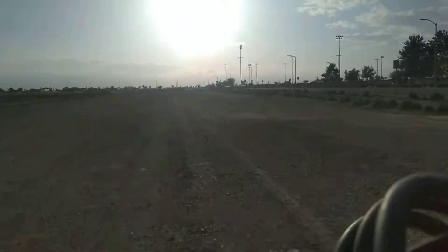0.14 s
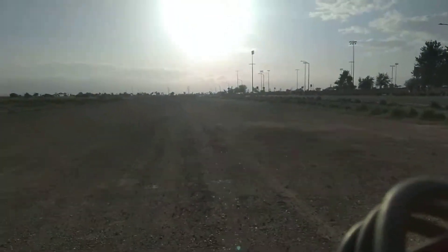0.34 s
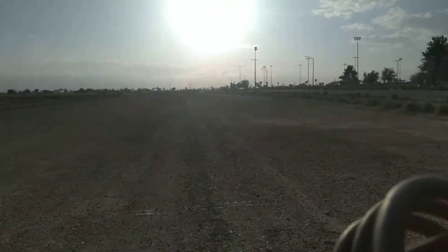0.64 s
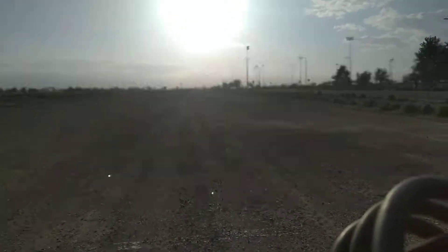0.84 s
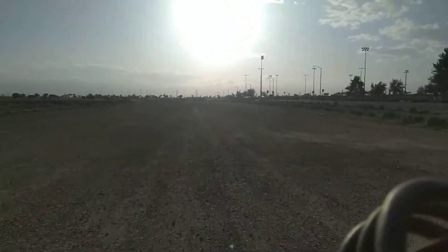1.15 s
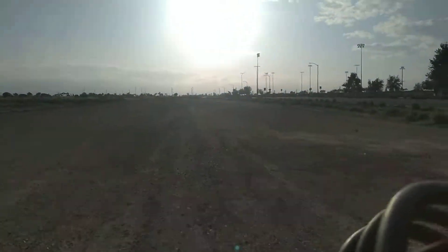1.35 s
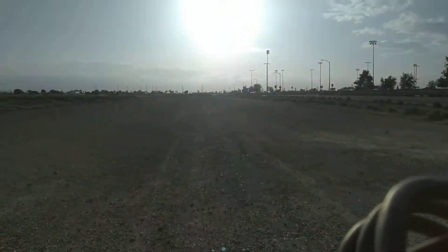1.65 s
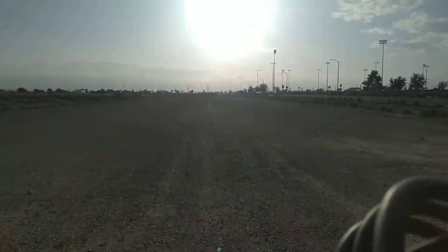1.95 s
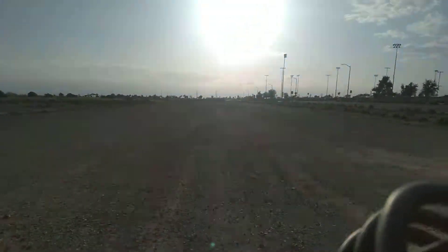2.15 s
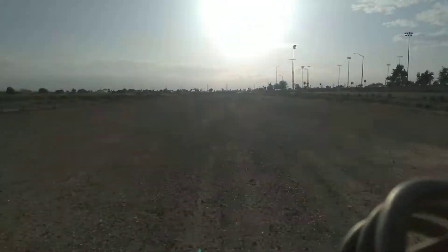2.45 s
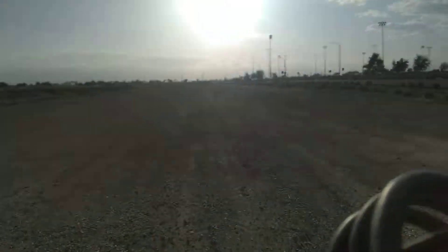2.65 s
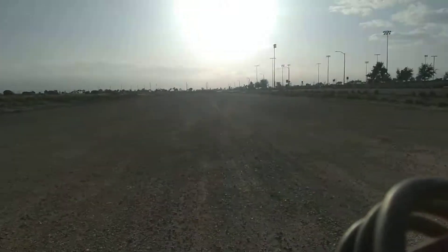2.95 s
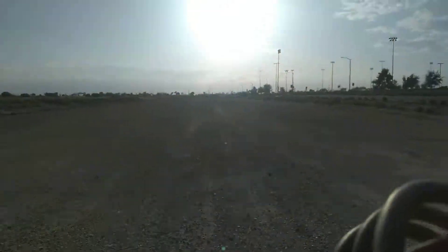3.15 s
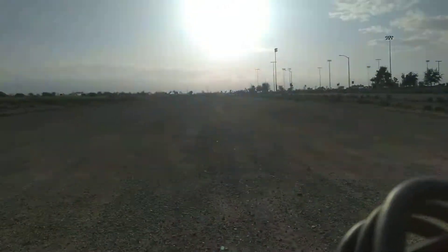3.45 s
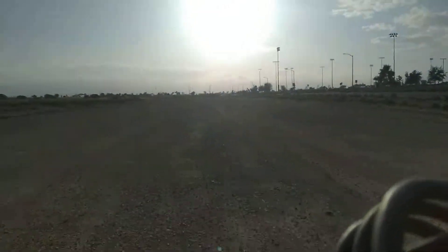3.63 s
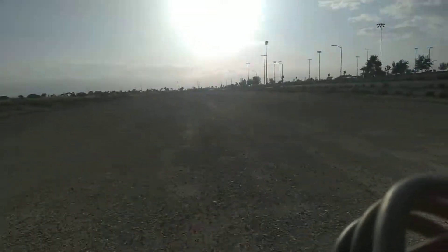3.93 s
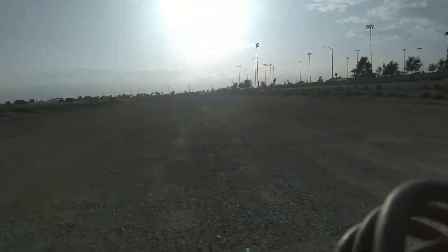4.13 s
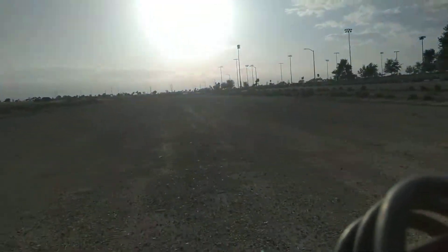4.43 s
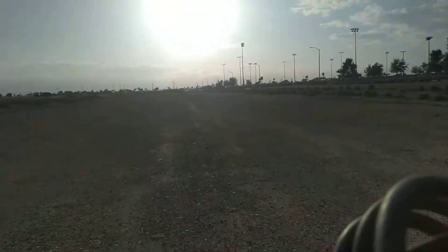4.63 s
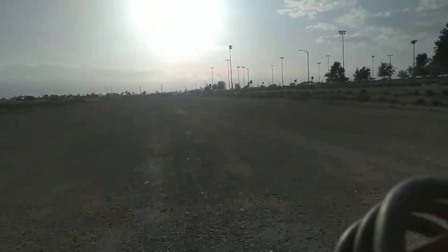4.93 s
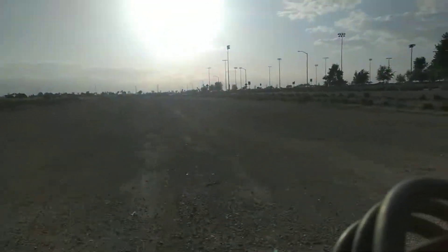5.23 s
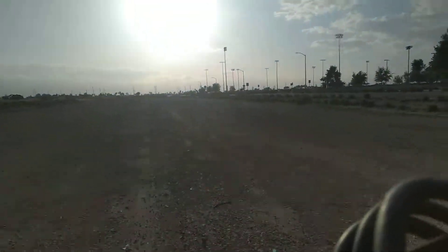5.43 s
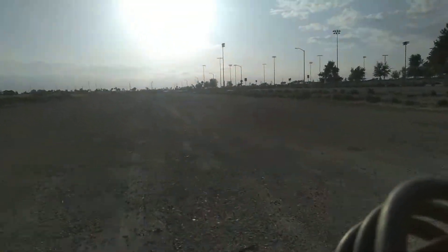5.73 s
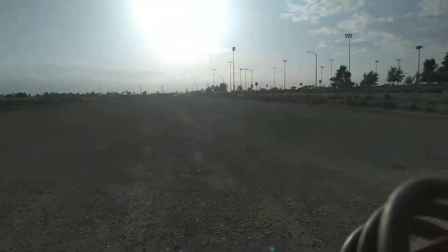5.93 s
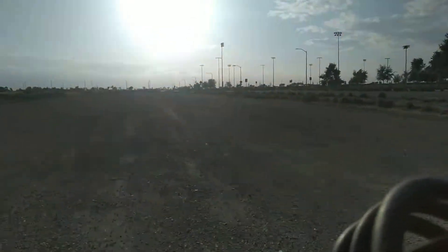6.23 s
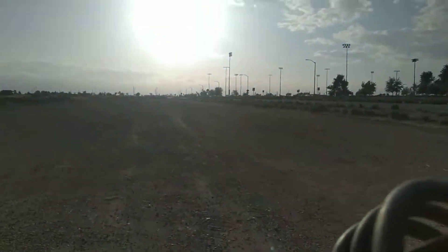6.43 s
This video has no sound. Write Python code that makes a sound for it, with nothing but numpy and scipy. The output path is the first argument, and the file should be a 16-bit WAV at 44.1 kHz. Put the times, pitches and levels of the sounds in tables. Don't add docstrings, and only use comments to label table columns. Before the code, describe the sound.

Tyres roll over loose gravel, close up, with dull shaking rumble, knocks and thuds, stones snapping brightly, and the roll easing near the end.

```python
import sys
import numpy as np
from scipy import signal
from scipy.fft import rfft, irfft, next_fast_len
from scipy.io import wavfile
from scipy.ndimage import uniform_filter1d, map_coordinates

SR = 44100
rng = np.random.default_rng(int(sys.argv[2]) if len(sys.argv) > 2 else 0)


def digitize_waveform(pressure):
    field = np.atleast_2d(pressure).T
    bounded = np.clip(field, -1, 1)
    quanta = np.round(bounded * 32767).astype(np.int16)
    wavfile.write(sys.argv[1], SR, quanta)


def nominal_scale(level):
    x = np.asarray(level, float) / 20
    return 10 ** x


N = 290178
LEAD = 0.015

# freq_hz, density_db (per Hz)
GRAVEL_COLOUR = [(500, -6), (1000, 0.5), (1800, 2.5), (2400, 2.5), (3000, -2), (3600, -3.5), (4400, 2),
                 (5700, -4), (7200, -1.5), (7800, -4), (8200, -16), (11600, -22.5), (12400, -25),
                 (14800, -35), (16500, -64)]


def unit(x):
    return x / np.sqrt(np.mean(x ** 2) + 1e-20)


def along(points, hz):
    f, v = np.transpose(points)
    return np.interp(np.log(hz + 1), np.log(f + 1), v)


def wobble(rate):
    knots = rng.standard_normal(int(N * rate / SR) + 4)
    curve = map_coordinates(knots, [np.arange(N) * rate / SR])
    return curve - uniform_filter1d(curve, SR // 8)


def filtered(x, response):
    length = x.shape[-1]
    m = next_fast_len(length + 1024)
    spectrum = rfft(x, m) * response(np.fft.rfftfreq(m, 1 / SR))
    return irfft(spectrum, m)[..., :length]


def grains(rate, spread_db, noise):
    u, e, z = rng.random(N), rng.exponential(size=N), rng.standard_normal((2, N))
    size = nominal_scale(spread_db * np.minimum(e, 3))
    spikes = (u < rate / SR) * size * np.sign(z[0])
    return unit(unit(spikes) + noise * z[1])


def laid_out(times, pair):
    track = np.zeros((2, N + SR))
    for s, burst in zip(times, np.moveaxis(pair, 0, 1)):
        track[:, round(s * SR):][:, :burst.shape[-1]] += burst
    return track[:, :N]


def at_ports(near, left, right, rock):
    # freq_hz, share
    through_shell = [(1000, 0.59), (1400, 0.047), (1750, 0.45), (2100, 0.62), (2500, 0.55), (3100, 0.92),
                     (3500, 0.61), (3900, 0.71), (4200, 0.024), (9000, 0.034)]
    # freq_hz, left_trails_rad
    turn = [(1400, 0), (2000, 1), (2450, 3), (3500, 3.25), (4000, 3.5)]
    share = lambda f: np.clip(along(through_shell, f), 0, 1)
    rest = filtered(np.array([left, right]), lambda f: np.sqrt(1 - share(f)))
    sign = np.reshape([-1, 1], (2,) + (1,) * near.ndim)
    half = lambda f: np.sqrt(share(f)) * np.exp(0.5j * rock * along(turn, f) * sign)
    return rest + filtered(near, half)


def shake(level_db, sharp_db):
    # freq_hz, density_db (per Hz)
    dull = [(15, -66), (25, -60), (43, -37), (89, -5), (118, 1), (209, 0.5), (400, -7), (520, -18.5),
            (880, -120)]
    # freq_hz, density_db (per Hz)
    edge = [(180, -17), (300, 1), (400, 0), (700, -5), (1000, -12.5), (1400, -23.5), (2000, -30),
            (2700, -55), (4400, -101)]
    # freq_hz, likeness (1 = the same)
    alike = [(30, .55), (70, 0.78), (150, 0.84), (300, 0.78), (500, 1), (1200, 0.19)]
    angle = lambda hz: np.arccos(np.clip(along(alike, hz), -1, 1)) / 2
    lumps = np.minimum(0.5 * wobble(15) + 0.92 * wobble(45), 1.4)
    parts = ((dull, level_db, 1.1, 700), (edge, level_db + sharp_db, 3.3, 450))
    out = 0
    for colour, db, depth_db, rate in parts:
        pair = np.array([grains(rate, spread_db=3.5, noise=0.56), grains(rate, spread_db=2.5, noise=0.7)])
        spread = lambda hz: nominal_scale(along(colour, hz)) * [np.cos(angle(hz)), np.sin(angle(hz))]
        mid, side = filtered(pair, spread)
        swell = nominal_scale(depth_db * lumps + 0.12 * wobble(23))
        out = out + nominal_scale(db + 1.0) * unit(swell * np.array([mid + side, mid - side]))
    return out


def knocks():
    # start_s, peak_db, pitch_hz, left_right_db
    jolts = [(0.007, -13.5, 745, 3), (0.074, -12.5, 650, 5), (0.101, -26, 820, -6), (0.227, -14.5, 520, 2),
             (0.282, -20, 490, -12), (0.379, -24, 885, -10), (0.415, -17, 487, -7), (0.456, -10.5, 544, -5),
             (0.723, -9, 482, -2.5), (0.767, -11, 482, 2), (0.908, -10.5, 540, 1), (1.042, -20, 482, -2.5),
             (1.247, -24, 810, -1.5), (1.366, -23, 506, 0), (1.502, -13, 640, 8), (1.543, -11, 544, 1),
             (1.585, -9.5, 574, 4), (1.724, -18, 590, 1), (1.909, -12.5, 637, 1), (2.046, -18, 740, -12),
             (2.079, -14, 660, 2), (2.237, -11, 650, 2), (2.371, -16.5, 740, 9), (2.438, -18, 533, 3),
             (2.493, -15, 520, 7), (2.564, -17.5, 580, 6), (2.743, -10.5, 630, -14),
             (2.805, -15, 540, -1.5), (3.112, -17.5, 695, -8), (3.412, -13, 503, 1.5), (3.536, -10, 511, 1),
             (3.587, -19, 540, 1), (3.631, -9, 614, 4), (3.766, -16, 606, -1.5), (3.784, -17, 1010, -0.5),
             (3.86, -19, 656, 3), (4.003, -12.5, 506, 1.5), (4.029, -13.5, 603, 1.5), (4.195, -18, 507, 4),
             (4.427, -13.5, 486, 6), (4.469, -19, 476, 6), (4.527, -18, 554, 8), (4.609, -15, 583, 7),
             (5.161, -25, 540, 4), (5.225, -16.5, 1000, 15), (5.275, -21, 800, 6), (5.476, -19, 705, 14),
             (5.718, -18, 515, -3), (5.93, -18, 630, -11), (6.095, -21, 503, 1.5)]
    s, db, hz, pan_db = np.transpose(jolts)[..., None]
    t = np.arange(1200) / SR
    upper = 1.692 + 0.12 * rng.standard_normal(hz.shape)
    modes = np.sin(2 * np.pi * hz * t)
    modes = modes + 0.43 * np.sin(2 * np.pi * upper * hz * t)
    modes = modes + 0.1 * np.sin(2 * np.pi * upper ** 2 * hz * t)
    decay = nominal_scale(db + 5.5 - 60 * t / 0.015)
    jolt = decay * (1 - np.exp(-t / 0.001)) * modes
    side = nominal_scale(0.45 * np.array([pan_db, -pan_db]))
    return laid_out(s[:, 0], side * jolt)


def thuds():
    # start_s, peak_db, pitch_hz
    drops = [(0.074, -6, 382), (0.22, -8, 280), (0.318, -2, 151), (0.406, -7, 156), (1.016, -2, 149),
             (1.076, 0, 195), (1.241, -9, 202), (1.502, -15, 261), (1.722, -1.5, 155), (1.801, -5, 199),
             (2.448, -12, 247), (2.49, 2, 248), (2.6, -19, 186), (2.938, 0.5, 184), (2.977, -5, 286),
             (3.211, -14, 172), (3.241, -14, 256), (3.449, 4, 221), (3.826, -5, 222), (3.855, -11, 226),
             (4.253, -16, 242), (4.379, -5, 185), (4.474, -6, 226), (4.788, -16, 290), (4.812, -15, 151),
             (4.952, -4, 227), (5.066, -15, 245), (5.225, -22, 210), (5.307, -6.5, 261), (5.4, -19, 210),
             (5.493, -12, 258), (5.612, -18, 224), (5.681, -30, 199), (5.724, -6, 358), (5.793, -20, 213),
             (5.873, -20, 199), (5.918, -5.5, 253), (5.992, -6, 187), (6.092, -8, 415), (6.125, -4.5, 231),
             (6.381, -29, 180), (6.487, -22, 144)]
    gain_db, cycles, rise_s = -7, 13.7, 0.0041
    s, db, hz = np.transpose(drops)[..., None]
    t = np.arange(3000) / SR
    decay = nominal_scale(db + gain_db - 60 * t * hz / cycles)
    ring = decay * (1 - np.exp(-t / rise_s)) * np.sin(2 * np.pi * hz * t)
    side = nominal_scale(1.1 * rng.standard_normal((len(drops), 2, 1)))
    return laid_out(s[:, 0], np.moveaxis(side * ring[:, None], 1, 0))


def gravel(count=12):
    # start_s, peak_db, left_right_db, ring_hz, scatter_db
    chips = [(.1022, -24, 12, 5040, -8), (.401, -22, -8, 7050, -5), (.407, -18, -2, 6960, -32),
             (.9717, -24, -11, 6160, -12), (1.036, -32, -16, 7060, 0.5), (1.2745, -22.5, 1, 2400, -6),
             (1.3396, -27.5, 8, 6300, -8), (1.9633, -31, 24, 5340, 3), (2.3736, -24.5, 17, 8400, -32),
             (2.4543, -19.5, 1, 6800, -4.5), (2.6883, -34.5, -11, 6960, -1), (2.7436, -21, 2.5, 4300, -33),
             (2.9063, -23.5, -20, 6240, -12), (3.0628, -24.5, -18, 4500, -8), (3.0688, -16, -1, 7100, -14),
             (3.47, -28.5, 3, 7000, -3), (4.323, -37, -20, 4370, 6), (4.3789, -23, 6, 6500, -15),
             (5.003, -22, -1, 4960, 13), (5.9309, -23, -8, 5000, -15), (5.947, -19.5, 5, 6450, -7.5),
             (6.022, -20.5, 4, 5870, 6), (6.0272, -20.5, -2, 4830, 4), (6.113, -21.5, 5, 5930, -11),
             (6.4428, -27, 2.5, 7440, 5)]
    # start_s, peak_db, left_right_db, ring_hz, scatter_db
    middling = [(.0202, -20.5, 14, 7600, -38), (.1128, -23.5, -5, 4730, -25), (.1497, -18.5, 6, 2220, -21),
                (.9077, -26.5, -2, 4860, -4), (.9718, -21, 2, 4700, -19), (1.4164, -25, 0, 5500, 1),
                (1.9694, -25.5, -2, 4400, 12), (2.198, -25, 2, 2540, -1), (2.2455, -16, 13, 2530, -43),
                (2.4194, -29, -3, 2390, -32), (2.5353, -24.5, 0.5, 7360, -29), (3.0053, -13, -3, 4550, -16),
                (3.3003, -29, -17.5, 4300, -32), (3.7775, -14.5, 3, 4750, -14), (3.9348, -22, 7, 4800, -19),
                (4.352, -17.5, -5, 6500, -8.5), (4.5104, -15, 1, 4140, -16), (4.889, -27, 7, 5230, -30),
                (5.1626, -16.5, 1, 2340, -25), (5.2248, -13, 3.5, 5040, -11), (5.476, -21.5, 0.5, 4030, -1),
                (5.5582, -27, -2, 2600, -1), (5.7194, -30, -12, 4630, -7), (5.742, -31, 15, 5240, -18)]
    # start_s, peak_db, left_right_db, ring_hz, scatter_db
    rocks = [(.481, -30, -7, 2270, -19), (.5057, -27.5, 9, 4100, -22), (1.239, -17.5, 17, 4270, -13),
             (1.2475, -8.5, -8.5, 2240, -25), (1.3688, -27.5, 8, 5700, -23), (1.9105, -8.5, 1.5, 1780, -34),
             (1.9121, -17.5, 11, 3540, -13), (2.0457, -29, -11, 2200, -2), (2.076, -26.5, -10, 2200, -14),
             (2.2382, -16.5, -3, 5900, -14), (2.3705, -29, 6, 5040, -25), (3.527, -31, -8, 4600, -17),
             (3.7868, -10, -6, 2510, -21), (3.812, -28, 14, 6000, -4), (3.8398, -22.5, -4, 4700, -6),
             (3.8758, -28, 10, 2790, -21), (3.9946, -26.5, 0, 4200, -13), (4.0559, -15.5, 7.5, 3200, -18),
             (4.0734, -20, 0, 2450, -24), (4.083, -20, 0, 1700, -20), (4.7704, -28, 1, 1700, -12),
             (5.0735, -28.5, -17, 4660, -7), (5.52, -29, 3, 5480, 2), (5.583, -29.5, 4, 4500, -4),
             (6.2476, -30, -10, 1700, -21)]
    # start_s, peak_db, left_right_db, ring_hz, scatter_db
    ticks = [(.1371, -30.5, 0, 2250, -6), (.272, -31, -6, 5000, -18), (.2977, -30, -2, 4660, -13),
             (.7687, -27, 6, 2000, -15), (1.122, -31, 4, 4350, -20), (1.533, -33.5, -8, 4100, -30),
             (1.901, -23, 4, 2880, -18), (1.917, -34.5, -23, 4520, 13), (1.978, -21, -2, 4300, -10),
             (2.2495, -28, -1, 6950, -5), (2.2655, -30, 2, 6500, -2), (2.3645, -31, 6, 6500, -25),
             (2.300, -26.5, 1, 6400, -10), (2.4414, -28, -6, 2100, -21), (3.257, -29, 5, 5000, -12),
             (3.785, -22.5, -17, 5500, -15), (3.797, -21.5, 6, 6500, -9), (4.4413, -32.5, -9, 6240, -5),
             (4.9397, -30.5, -12, 4500, 4), (4.955, -32, 1, 5000, -10), (5.010, -33, -1, 4960, -3),
             (5.366, -34, 6, 2200, -22), (5.876, -39, -3.5, 5000, -6), (6.152, -38, -8, 6500, -24),
             (6.2961, -34, -2, 6680, 4), (6.355, -30.5, -4, 7000, -11), (6.488, -37, 17, 5000, -13)]
    kinds = ((chips, -2.5), (middling, -13), (rocks, -18), (ticks, -11.5))
    u, z = rng.random((count, 2)), rng.standard_normal((count, 4))
    start_s = LEAD + u[:, 0] * (N / SR - LEAD)
    peak_db, pan_db = -49 + 2 * z[:, 0], 7 * z[:, 1]
    ring_hz = 2200 * 3.2 ** u[:, 1]
    scatter_db, bright_db = -6 + 5 * z[:, 2], -8 + 6 * z[:, 3]
    pebbles = np.c_[start_s, peak_db, pan_db, ring_hz, scatter_db, bright_db]
    return np.vstack([[row + (db,) for rows, db in kinds for row in rows], pebbles])


def stones():
    # freq_hz, width_hz, level_db
    housing = (2520, 500, 1.5)
    shell_hz, shell_width, shell_db = housing
    s, db, pan_db, ring_hz, scatter_db, bright_db = gravel().T[..., None]
    t = np.arange(3600) / SR - LEAD
    z = rng.standard_normal((len(s), 4, len(t)))

    snap = nominal_scale(-60 * np.maximum(t - 0.001, 0) / 0.011 + 60 * np.minimum(t - 0.001, 0) / 0.0053)
    scatter = nominal_scale(scatter_db - 60 * np.maximum(t, 0) / 0.13 + 60 * np.minimum(t - 0.004, 0) / 0.024)
    rough = nominal_scale(3 * unit(uniform_filter1d(z[:, 3], 60)) - 4)
    body = np.sign(z[:, :3]) * snap + z[:, :3] * (scatter * rough)[:, None]

    mode = lambda f, hz, width: 1j * f * width / (hz ** 2 - f * f + 1j * f * width)
    rings = lambda f: 0.9 + mode(f, ring_hz, 1100) + 0.74 * mode(f, ring_hz, 170)
    top_db = -1 + 0.25 * bright_db
    treble_db = lambda f: (bright_db + 12.5) * np.clip((f - 3000) / 1500, 0, 1)
    tilt = lambda f: nominal_scale(treble_db(f) + top_db * (f > 8200))
    colour = lambda f: (rings(f) * tilt(f) * nominal_scale(along(GRAVEL_COLOUR, f)))[:, None]
    rock = 1 + 0.15 * z[:, 3, :1]
    pair = at_ports(*np.moveaxis(filtered(body, colour), 1, 0), rock)

    dullness = nominal_scale(-0.4 * (bright_db + 46.0))
    shell = filtered(body[:, 0], lambda f: nominal_scale(shell_db) * dullness * mode(f, shell_hz, shell_width))
    pair = pair + np.array([shell, -shell])
    peak = np.abs(pair).max(axis=(0, 2), keepdims=True)
    pair = pair / peak * nominal_scale(db + 3.0 + np.array([pan_db, -pan_db]) / 2)
    return laid_out(s[:, 0] - LEAD, pair)


def sparks():
    # start_s, peak_db, left_right_db
    splinters = [(0.02, -34, 19.5), (0.107, -30, 23.0), (0.148, -40, 16), (0.3995, -33, -8),
                 (0.7676, -34, 14.5), (0.9712, -44, 0.0), (1.2385, -39.5, 18.5), (1.244, -31.5, 19.5),
                 (1.3383, -44, 12.0), (1.904, -50, 3), (1.9618, -34, 9.5), (2.2482, -36.5, 17.0),
                 (2.371, -32.5, 28), (2.4383, -55, 10), (2.4537, -34.5, 5.5), (2.7445, -33.5, 19),
                 (2.9057, -32, -14.0), (3.0045, -30, 22), (3.0653, -33, -6), (3.7622, -41, 1),
                 (3.7767, -35, -2), (3.8117, -31, 7.5), (3.9329, -34, 16), (4.3326, -47, -5),
                 (4.3629, -46, 9.0), (4.3788, -37, 16), (4.8867, -38, 15.5), (5.1621, -43, 8.5),
                 (5.2255, -26.5, 14), (5.4776, -29.5, 24.5), (5.7393, -41, 14.5), (5.931, -44, 2),
                 (5.9446, -32.5, 20), (5.9717, -34, 6), (6.0201, -40, -2), (6.0715, -39, 7.5),
                 (6.4437, -42, 13.5)]
    # freq_hz, density_db (per Hz)
    thin = [(7000, -39), (8400, 4), (11600, -2), (12600, -8), (15000, -10), (16500, -37)]
    s, db, pan_db = np.transpose(splinters)[..., None]
    t = np.arange(1500) / SR - LEAD
    shape = nominal_scale(-60 * np.maximum(t - 0.001, 0) / 0.023 + 60 * np.minimum(t - 0.001, 0) / 0.0075)
    noise = rng.standard_normal((2, len(s), len(t)))
    pair = filtered(shape * noise, lambda hz: nominal_scale(along(thin, hz)))
    lean_db = (pan_db - 4) / 2
    side_db = np.array([lean_db, -lean_db]) - np.abs(lean_db)
    pair = pair / np.abs(pair).max(axis=2, keepdims=True) * nominal_scale(db + 2.0 + side_db)
    return laid_out(s[:, 0] - LEAD, pair)


def crunch(level_db):
    clumps = nominal_scale(1.3 * wobble(18) + 2.2 * wobble(70) + 2.2 * wobble(300))
    grit = [clumps * grains(4000, spread_db=4.5, noise=1.1) for _ in range(3)]
    pair = at_ports(*grit, rock=0.91)
    return nominal_scale(level_db + 6.5) * unit(filtered(pair, lambda hz: nominal_scale(along(GRAVEL_COLOUR, hz))))


def crush():
    # start_s (middle of the swell), half_length_s, level_db
    presses = [(0.094, 0.032, -34), (0.494, 0.039, -36), (0.735, 0.0088, -29), (0.81, 0.026, -32),
               (1.122, 0.027, -30), (1.456, 0.02, -29.5), (1.563, 0.012, -23), (1.583, 0.0029, -32),
               (2.048, 0.012, -35), (2.082, 0.023, -29), (2.495, 0.0049, -29), (2.88, 0.05, -35),
               (3.03, 0.086, -42), (3.447, 0.042, -40), (3.623, 0.032, -42), (4.037, 0.029, -38),
               (4.55, 0.056, -45), (4.831, 0.01, -35), (5.066, 0.0087, -46), (5.283, 0.0055, -44),
               (5.495, 0.02, -32.5), (5.733, 0.019, -38.5), (5.943, 0.025, -36.5), (6.257, 0.0076, -40)]
    # freq_hz, density_db (per Hz)
    heap = [(250, -23), (500, 9), (800, 4.5), (1300, -2), (1900, -15), (2700, -22.5), (4000, -77)]
    gain_db, floor_db = 4, -51.5
    t = np.arange(N) / SR
    swells = sum(nominal_scale(db + gain_db) * np.exp(-((t - at) / half) ** 2) for at, half, db in presses)
    press = nominal_scale(floor_db) + swells
    near, far = grains(220, spread_db=4, noise=0.15), grains(220, spread_db=4, noise=0.15)
    pair = np.array([near + 0.5 * far, near - 0.56 * far])
    return press * unit(filtered(pair, lambda hz: nominal_scale(along(heap, hz))))


def scene():
    # start_s, shake_db, grit_db
    roll = [(0, -19.5, -50), (.4, -22.5, -51), (.75, -19, -48.5), (1.2, -22, -52.5), (1.55, -19.5, -51),
            (1.85, -20, -52.5), (2.15, -20.5, -51), (2.6, -22.5, -50.5), (3.0, -20, -47.5),
            (3.5, -20.5, -47), (3.95, -21, -46.5), (4.3, -22, -49.5), (4.6, -19.5, -49), (4.9, -26, -50),
            (5.25, -26, -47.5), (5.5, -35.5, -58), (6.0, -32, -48), (6.58, -28, -53)]
    # start_s (middle), half_length_s, body_db, edge_db
    ruts = [(0.047, 0.021, -6.5, -10), (0.295, 0.014, -9, -14.5), (0.756, 0.0083, -1.5, -18),
            (0.856, 0.02, -4.5, -10), (0.926, 0.012, 5.5, 6.5), (1.087, 0.053, 0.5, 3),
            (1.127, 0.0062, 11, 6), (1.523, 0.13, -0.5, 2.5), (1.679, 0.056, -5.5, -4.5),
            (2.112, 0.031, 5, 3), (2.297, 0.034, -9.5, -4), (2.419, 0.024, -14, -10),
            (2.491, 0.0072, 4, 5.5), (2.551, 0.054, -6, -8), (2.775, 0.015, -9, -6),
            (2.93, 0.028, -18, -5.5), (4.332, 0.011, 3, 6), (4.364, 0.039, -3, -11), (4.699, 0.036, -8, -7),
            (4.777, 0.033, -3.5, -6), (5.05, 0.033, 5.5, 0), (5.456, 0.061, -6.5, -14),
            (5.511, 0.031, 12.5, 26), (5.633, 0.025, 5, 1), (5.733, 0.016, -4, 22), (5.843, 0.048, -4, 2),
            (5.99, 0.031, 8, 9), (6.022, 0.011, -13, 12), (6.135, 0.0071, 2, 7), (6.53, 0.12, -14, -6)]
    t = np.arange(N) / SR
    s, *levels = np.transpose(roll)
    roll_db, crunch_db = [np.interp(t, s, level) for level in levels]
    body_db, edge_db = sum(np.exp(-((t - at) / half) ** 2) * [[body], [edge]]
                           for at, half, body, edge in ruts)
    slowing_db = roll_db - roll_db.max()
    sharp_db = -4.5 + 0.52 * slowing_db + edge_db - body_db
    ground = shake(roll_db + body_db, sharp_db) + crunch(crunch_db)
    return ground + stones() + knocks() + crush() + thuds() + sparks()


def band_limit(x):
    return signal.sosfilt(signal.butter(12, 15900, fs=SR, output="sos"), x)


def record(dry):
    # freq_hz, left_right_db
    port_colour = [(150, 2), (500, 0), (2050, -1.5), (2500, 3), (3500, 2), (4500, -4), (6300, -5),
                   (8700, 6), (14000, 6)]
    low_cut = lambda hz: hz ** 4 / (hz ** 4 + 36.0 ** 4)
    ports = filtered(dry, lambda hz: nominal_scale(along(port_colour, hz) * [[0.5], [-0.5]]) * low_cut(hz))
    ports = ports / (1 + np.abs(ports / 0.8) ** 4) ** (1 / 4)
    return band_limit(ports)


dry = scene()
out = record(dry)
digitize_waveform(out)
```